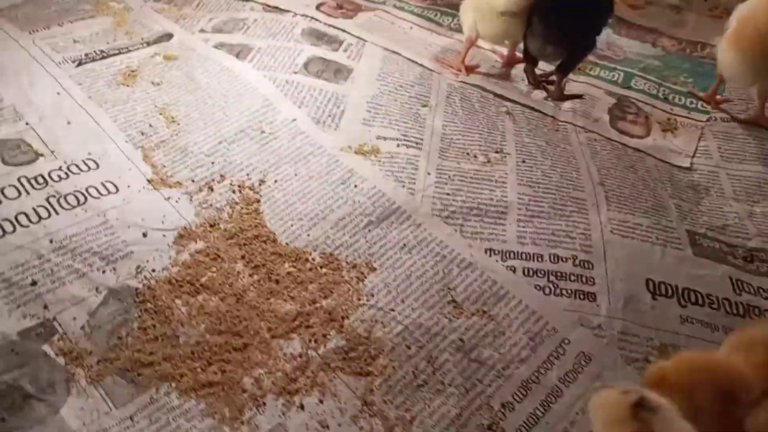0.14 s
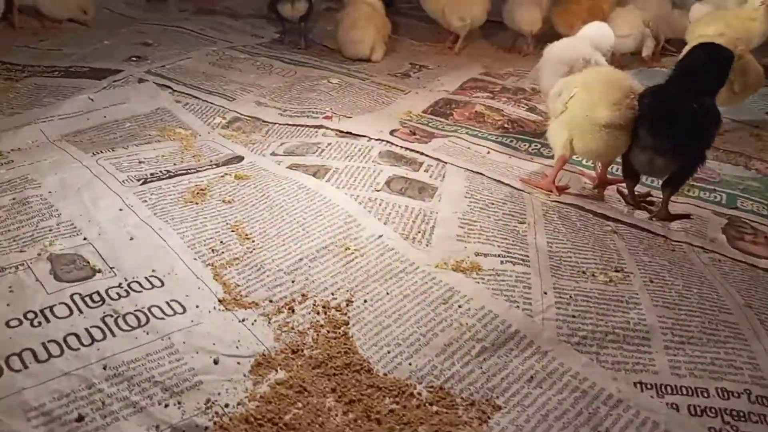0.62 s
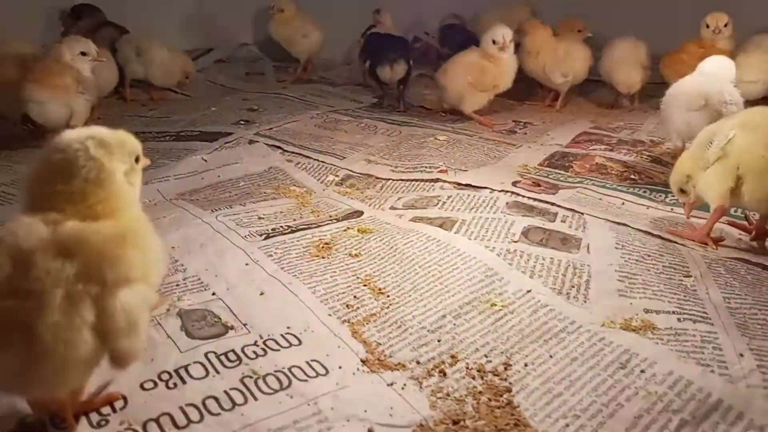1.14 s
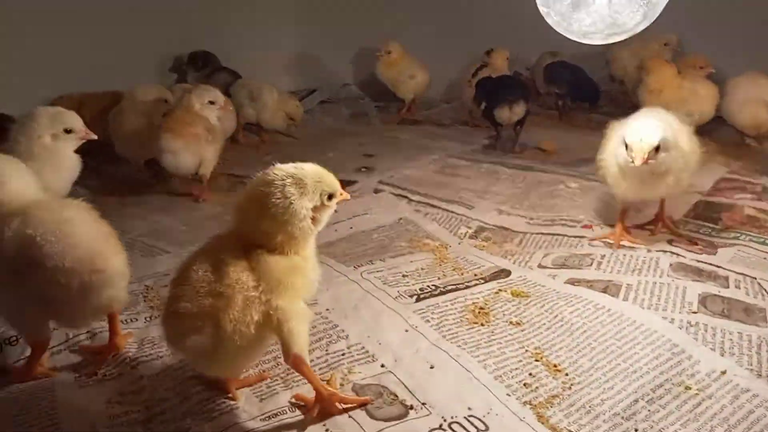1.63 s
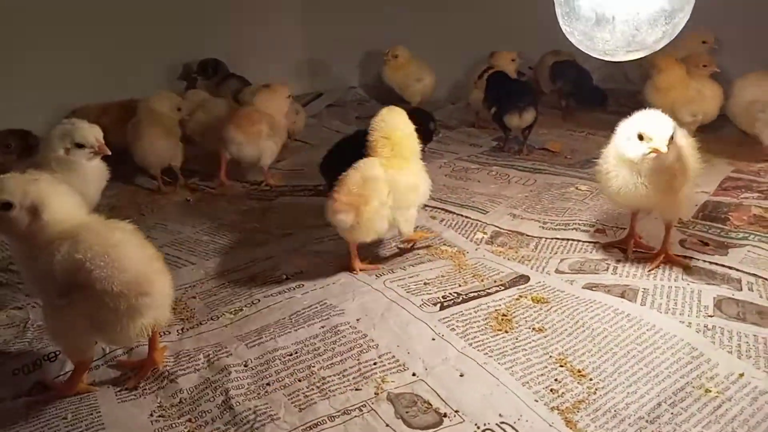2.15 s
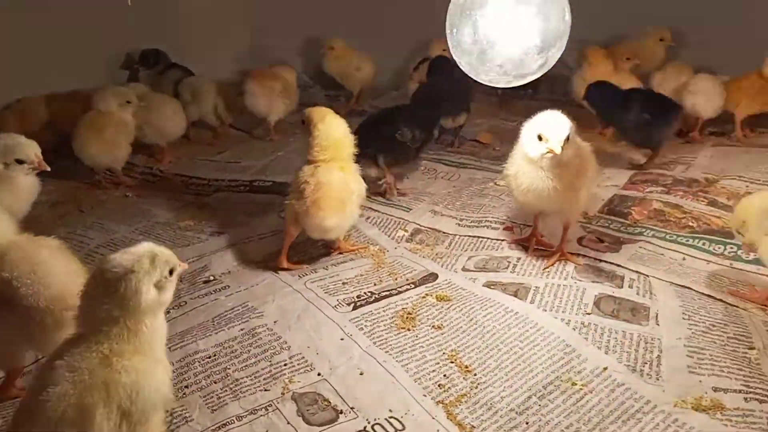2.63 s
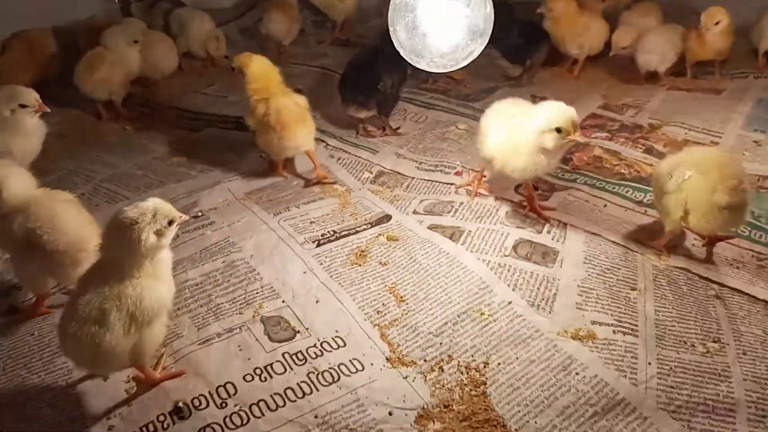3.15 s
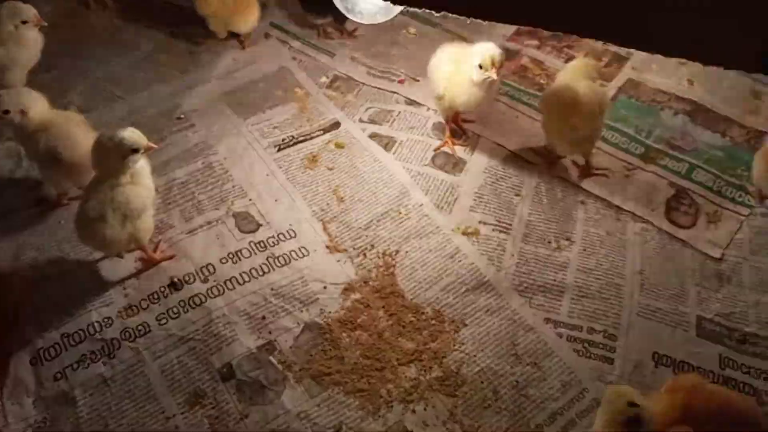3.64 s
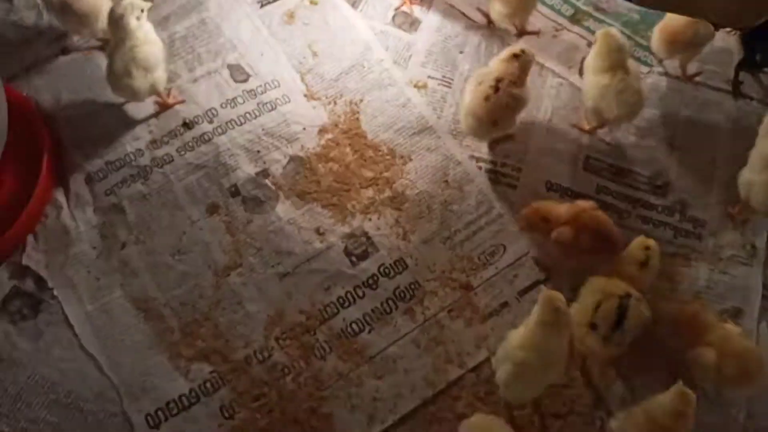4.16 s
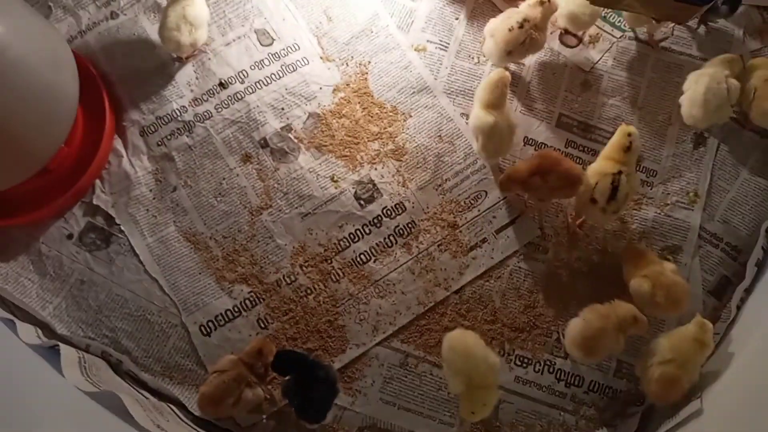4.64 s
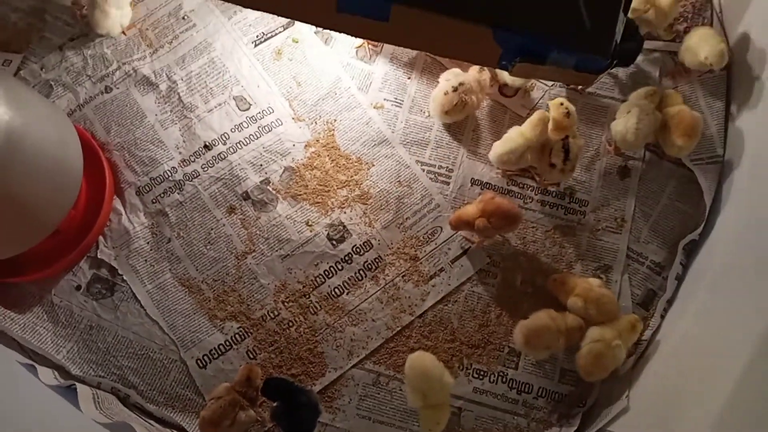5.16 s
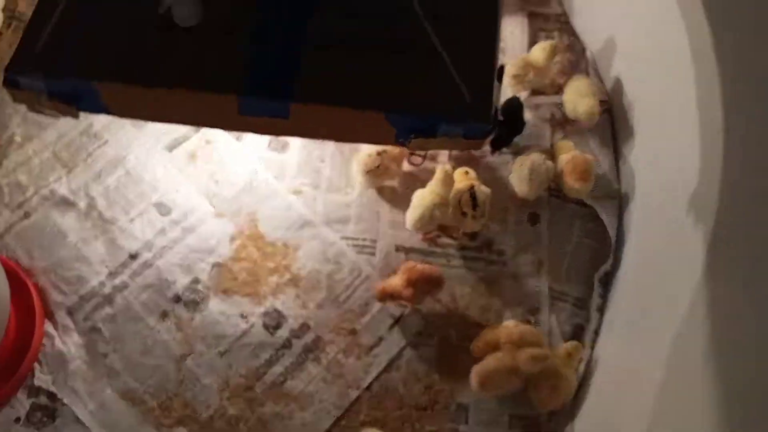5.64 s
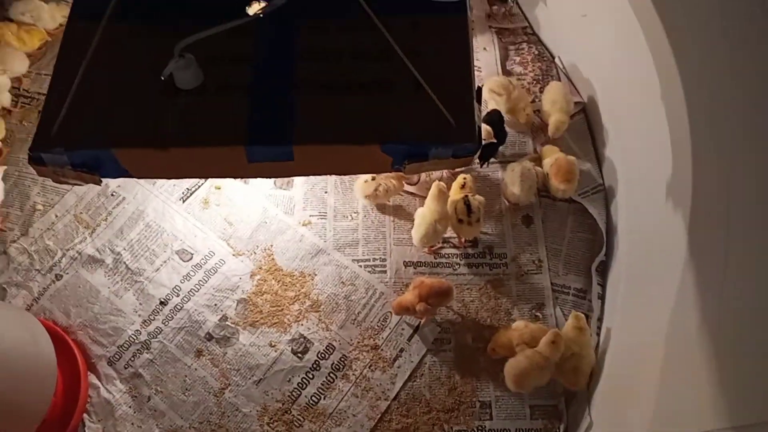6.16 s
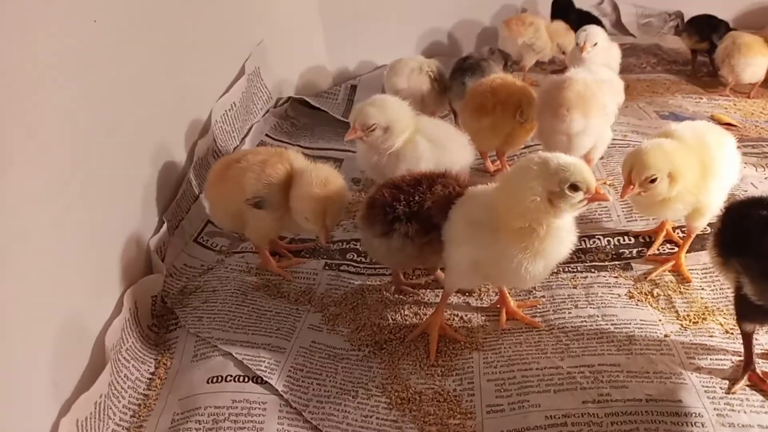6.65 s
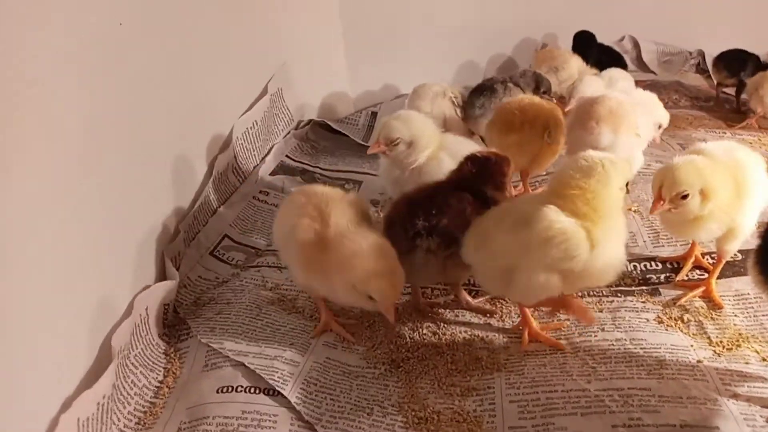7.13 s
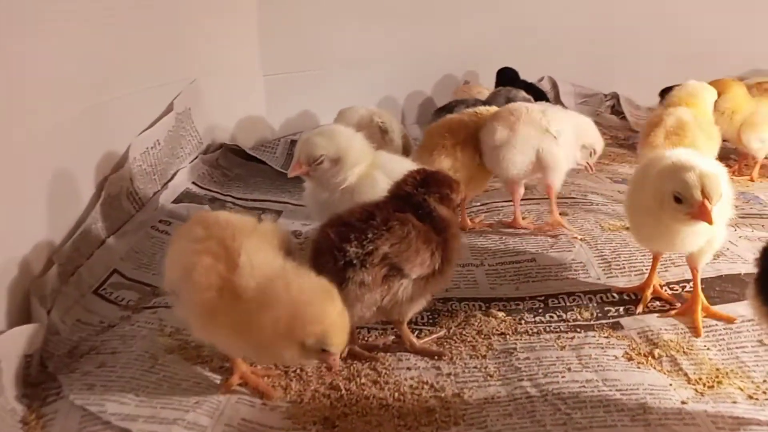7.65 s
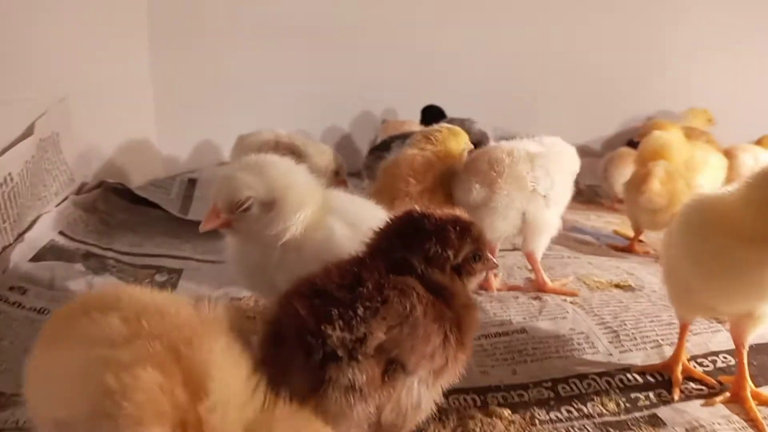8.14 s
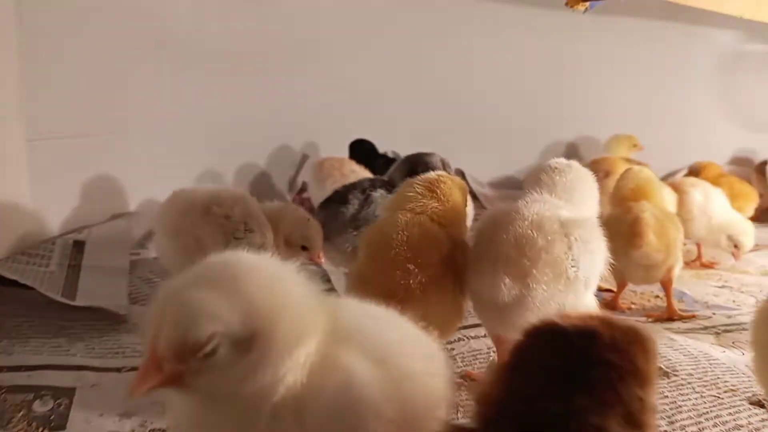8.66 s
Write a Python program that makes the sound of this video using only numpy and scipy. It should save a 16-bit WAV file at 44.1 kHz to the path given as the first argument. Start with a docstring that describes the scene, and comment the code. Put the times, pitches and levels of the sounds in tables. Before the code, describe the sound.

Many day-old chicks in a small, hard-walled pen lined with newspaper. Three near chicks repeat piercing falling cheeps over short peeps and a continuous reverberant crowd. Claws scratch paper in flurries. A handheld stereo microphone is rubbed and knocked mostly on the left until about five seconds; afterward the loud clear calls dominate, with a faint low hum swelling late.

```python
"""In a small pen lined with paper, under a lamp, day-old chicks peep: each call is a gliding sine with its octave.
Three near chicks repeat long falling calls over short near peeps and a random, reverberant crowd.
Feet scratch and tap as damped resonances; a hand rubs (band noise) and knocks (damped sines), mostly
on the left microphone. Noise bands flicker behind, a thin whistle steps and slides near 10 kHz,
and a low hum swells late."""
import sys
import numpy as np
from scipy import signal
from scipy.io import wavfile
from scipy.ndimage import uniform_filter1d

SR = 44100
rng = np.random.default_rng(int(sys.argv[2]) if len(sys.argv) > 2 else 0)


def file_out(sig):
    """Save sig as 16-bit WAV at sys.argv[1]."""
    # one column per channel
    cols = np.atleast_2d(sig).T
    # limit, then scale
    lim = np.clip(cols, -1, 1)
    pcm = np.round(lim * 32767).astype(np.int16)
    wavfile.write(sys.argv[1], SR, pcm)


def to_linear_factor(level_db):
    """Convert decibel levels (scalar or array-like) to linear amplitude factors."""
    exponent = np.asarray(level_db, float) / 20
    return 10 ** exponent


N = 387198  # samples
LEFT_LAG_S = 0.0010945  # the left channel lags the right


def in_time(rows):
    """Linear interpolation turns the columns after t/s into signals."""
    s, *columns = np.transpose(rows)
    return [np.interp(np.arange(N) / SR, s, c) for c in columns]


def band(x, low_hz, high_hz):
    """A Butterworth band-pass attenuates steeply outside its two corners."""
    return signal.sosfilt(signal.butter(4, [low_hz, high_hz], "band", fs=SR, output="sos"), x)


def rms_one(x):
    """Normalisation by the root mean square sets the effective value to 1."""
    return x / np.sqrt(np.mean(x ** 2))


def drift(rate_hz):
    """Interpolated Gaussian values form a slow random modulator."""
    steps = rng.standard_normal(int(N / SR * rate_hz) + 2)
    return np.interp(np.arange(N) / SR * rate_hz, np.arange(len(steps)), steps)


def pen(x, t60_s):
    """Reverberation between hard, close walls: convolution with decaying noise, independent for each ear."""
    t = np.arange(round(.4 * SR)) / SR
    tail = rng.standard_normal((2, len(t))) * to_linear_factor(-60 * t / t60_s) * (t > .002)
    early_echoes = (rng.random(tail.shape) < .01) * (t < .02)
    tail *= 1 + 4 * early_echoes
    unit_energy = tail / np.sqrt(np.sum(tail ** 2, 1, keepdims=True))
    return signal.fftconvolve(x, unit_energy, axes=1)[:, :N]


# Background spectrum: f/Hz of a band's upper edge, band level/dB in the left channel
AIR_SPECTRUM = [(30, -84.5), (600, -74.5), (1400, -71), (2200, -58), (4800, -43.5), (5600, -54.5),
                (7000, -41.5), (8600, -60.5), (12000, -61)]


def air():
    """Third-octave synthesis: noise bands fluctuate singly and together, weaker in the right channel."""
    edges = 30 * 2 ** np.arange(0, 8.7, 1 / 3)
    hz, db = np.transpose(AIR_SPECTRUM)
    white = rng.standard_normal((2, 2, N))  # neighbouring bands use different noises
    together = drift(9)
    out = 0
    for k, (low, high) in enumerate(zip(edges, edges[1:])):
        level_db = np.interp(np.log(high), np.log(hz), db) + 4 * drift(15) + 4 * together
        right_db = -20 if 5000 < low < 9000 else -7  # the right is shaded from the low treble
        noise = rms_one(band(white[k % 2], low, high))
        out = out + to_linear_factor(level_db) * noise * to_linear_factor([[0], [right_db]])
    flicker = to_linear_factor(-68.5 + 4.5 * together + 4.5 * drift(30))  # the highest treble flickers
    return out + flicker * rms_one(band(white[0], 14300, 15900))


# Late whistle glides: t/s, f/Hz
WHISTLE_GLIDES = [(6.9, 9880), (7.6, 9520), (7.63, 9820), (8.05, 9580), (8.08, 9830), (8.5, 9570)]


def whistle():
    """Frequency modulation: a tone steps through three pitches, later glides, and sits in narrow-band hiss."""
    steps_hz, round_s = np.array((9925, 9825, 9685)), .463  # one round holds three equal steps
    t = np.arange(N) / SR
    turn = (t / round_s + .1) % 1
    stepped_hz = steps_hz[(3 * turn).astype(int)]
    hz = np.where(t < WHISTLE_GLIDES[0][0], stepped_hz, in_time(WHISTLE_GLIDES)[0])
    waver = to_linear_factor(3 * drift(25))
    phase = 2 * np.pi * np.cumsum(hz + 15 * drift(40)) / SR
    tone = np.sin(phase) * to_linear_factor(-54) * waver
    hiss = rms_one(band(rng.standard_normal((2, N)), 9500, 10050))
    return tone + to_linear_factor(-56) * hiss


# How busy the feet are on the paper: t/s, level/dB before reverberation is added
FOOT_ACTIVITY = [(0, -49.5), (3.2, -43.5), (4.7, -51), (5.85, -58.5), (5.89, -50), (7.2, -48.5), (7.5, -64),
                 (8.78, -78)]


def scuffle():
    """Impulsive excitation of resonators: claws scratch paper in flurries, each scratch ringing a few cycles."""
    base_rate_hz, pitches = 700, 12
    born = rng.random(N) < base_rate_hz * to_linear_factor(8 * drift(10.5)) / SR
    sizes = born * to_linear_factor(5 * np.minimum(rng.exponential(1, N), 4)) * rng.choice([-1, 1], N)
    dealt = rng.integers(0, pitches, N)
    out = np.zeros((2, N))
    for k, hz in enumerate(np.geomspace(1150, 2600, pitches)):
        r = to_linear_factor(-60 * hz / (12 * SR))  # 60 dB of decay in 12 cycles
        w = 2 * np.pi * hz / SR
        hits = sizes * (dealt == k) + 1e-18
        out[k % 2] += signal.lfilter([0, np.sin(w)], [1, -2 * r * np.cos(w), r * r], hits)
    left, right = out[0] + out[1], out[0] - 0.22 * out[1]
    direct = rms_one(np.array([left, to_linear_factor(-10) * right]))
    return to_linear_factor(in_time(FOOT_ACTIVITY)[0]) * (direct + 0.98 * pen(direct, t60_s=0.25))


# Octave against the note: f/Hz of the octave, relative level/dB before each voice's own offset
OCTAVE_BALANCE = [(5000, -28), (7000, -16.5), (9000, -40), (12000, -23.5)]


def syrinx(out, s, hz, level, pan_db, octave_db=0, rasp_rad=0):
    """Phase modulation: a slower second vibration splits a raspy sine into sidebands; an octave is added."""
    rasp_hz, edge_s = 540, 0.015
    t = np.arange(len(hz)) / SR
    phase = 2 * np.pi * np.cumsum(hz) / SR + rasp_rad * np.sin(2 * np.pi * rasp_hz * t)
    edge = np.clip(np.minimum(t, t[-1] - t) / edge_s, 0, 1)
    octave = to_linear_factor(octave_db + np.interp(2 * hz, *np.transpose(OCTAVE_BALANCE)))
    breath = to_linear_factor(2.77 * np.interp(t * 150, np.arange(40), rng.standard_normal(40)))  # uneven
    voice = edge * level * breath * (np.sin(phase) + octave * np.sin(2 * phase))
    left_s = s + LEFT_LAG_S * (1 + .12 * rng.standard_normal())
    for channel, at, gain in ((0, left_s, 1), (1, s, to_linear_factor(-pan_db))):
        i = round(at * SR)
        piece = voice[max(-i, 0):max(N - i, 0)]
        out[channel, max(i, 0):max(i, 0) + len(piece)] += gain * piece


def peeps(rows, places):
    """Frequency glide: each short peep falls along a power curve; place sets the left-right level difference."""
    out = np.zeros((2, N))
    for (s, length, first_hz, target_hz, db), place in zip(rows, places):
        u = np.linspace(0, 1, round(1.15 * length * SR))  # runs on past the target
        bend = np.interp(first_hz, [4100, 4900], [2.0, 1.1])  # low peeps hold, high ones fall at once
        fall = (1.15 * u) ** bend - 0.197 * (bend - 1) * u * (1 - u)
        hz = first_hz + (target_hz - first_hz) * fall
        syrinx(out, s, hz, to_linear_factor(db) * np.sin(np.pi * u) ** 0.06, 8 + 12 * place, octave_db=4.5)
    return out


# Far chicks: t/s, relative level/dB
CROWD_LEVEL = [(0, -29.5), (1.1, -24), (5.1, -27.5), (6.5, -25.5), (8.78, -22.5)]


def crowd(count):
    """Superposition of random sources: far chicks peep at scattered times, each peep in its own place."""
    draw = rng.random((count, 6))
    s = (np.arange(count) + 3 * draw[:, 0]) / count * N / SR
    length = .03 + .045 * draw[:, 1]
    first_hz = 3300 + 1400 * draw[:, 2] ** 2
    target_hz = first_hz * (.66 + .17 * draw[:, 3])
    rows = np.c_[s, length, first_hz, target_hz, -18 * draw[:, 4]]
    return peeps(rows, draw[:, 5] - .3) * to_linear_factor(in_time(CROWD_LEVEL)[0] + 5.5)


# The microphones turn in the hand: t/s, left-right level/dB
MICROPHONE_FACING = [(0, 7.5), (2.5, 6.5), (5.2, 4), (6.8, 15), (7.6, 4.5), (8.78, 2)]


def long_calls(shape, calls, high_part_db, aside_db=0, rasp_rad=0):
    """Time and frequency scaling of one contour: the voice weakens in the drop, then falls louder."""
    out = np.zeros((2, N))
    when, pitch = np.transpose(shape)
    for s, stretch, scale, fall_db in calls:
        high_db = fall_db + high_part_db
        pan_db = np.interp(s, *np.transpose(MICROPHONE_FACING)) + aside_db
        t = np.arange(when[0], when[-1], 1 / SR / stretch)
        levels_db = [high_db, high_db - 4, fall_db, fall_db - 3, fall_db - 5]
        db = np.interp(t, [-.01, 0, .008, .04, when[-1]], levels_db)
        hz = uniform_filter1d(scale * np.interp(t, when, pitch), size=60)
        rasp = rasp_rad * np.clip(.5 - t / 0.06, 0, 1)  # fades out around the drop
        syrinx(out, s + when[0] * stretch, hz, to_linear_factor(db), pan_db, rasp_rad=rasp)
    return out


# Raspy contour: t/s from the steep drop, f/Hz; both before scaling
RASP_CONTOUR = [(-.075, 6250), (-.045, 6050), (-.02, 5580), (0, 5090), (.02, 4170), (.04, 3740),
                (.055, 2840)]
# Raspy calls: t/s of the drop, length factor/1, pitch factor/1, level/dB of the falling part
RASP_TIMES = [(.074, 0.9, 1.03, -17), (0.378, 0.85, 1.0, -13), (0.805, 0.95, 0.99, -16),
              (1.138, 1.0, 1.0, -15.5), (2.26, 0.9, 0.96, -18), (2.751, 1.12, 0.96, -25),
              (3.402, 1.17, 0.94, -19.5), (3.655, 0.79, 1, -15.5)]


def raspy_calls():
    """Sideband generation: phase modulation roughens the high part of one chick's falling call."""
    return long_calls(RASP_CONTOUR, RASP_TIMES, high_part_db=-8, aside_db=-4, rasp_rad=.75)


# Hand on the housing: t/s, length/s, low level/dB from pressure, crisp level/dB from speed; levels relative
RUB_STROKES = [(0.054, .12, -31, -53), (0.386, 0.17, -42.5, -57.5), (0.542, 0.13, -42.5, -55),
               (1.995, 0.061, -39.5, -56), (2.269, 0.13, -50.5, -52), (2.875, 0.14, -31, -48.5),
               (3.118, 0.35, -38.5, -52.5), (3.48, .24, -47, -54.5), (3.729, 0.17, -36, -44.5),
               (4.028, 0.24, -33, -61), (4.25, .15, -42, -52.5), (4.401, 0.2, -35.5, -55),
               (8.129, 0.29, -65.5, -59)]


def rub():
    """Friction noise: skin slips on the housing in patchy scuffs and sharp ticks, mostly on the left."""
    papery_db = 8.5  # papery middle, above the mean of low and crisp
    t, stroke = np.arange(N) / SR, np.zeros((3, N))
    for s, length, low_db, crisp_db in RUB_STROKES:
        db = [low_db, papery_db + (low_db + crisp_db) / 2, crisp_db]
        stroke += to_linear_factor(np.c_[db]) * np.sin(np.pi * np.clip((t - s) / length, 0, 1)) ** .8
    ticks = (rng.random(N) < 160 / SR) * to_linear_factor(6 * np.minimum(rng.exponential(1, N), 3))
    tick_swell = 1 + 1.1 * signal.lfilter([1], [1, -.95], ticks)
    grains = rng.standard_normal((2, N)) * to_linear_factor(4 * drift(30)) * tick_swell
    edges = [170, 700, 2600, 8200, 15800]  # Hz
    low, paper, crisp, top = [rms_one(band(grains, a, b)) for a, b in zip(edges, edges[1:])]
    # gains in dB, left then right
    soft = stroke[0] * to_linear_factor(4.8 * drift(28)) * low * to_linear_factor([[6], [-15]])
    papery = stroke[1] * to_linear_factor(6 * drift(19)) * paper * to_linear_factor([[7], [-9]])
    bright = stroke[2] * (crisp * to_linear_factor([[19], [4]]) + top)
    return soft + papery + bright


# Knocks: t/s, relative level/dB, thud f/Hz
KNOCK_HITS = [(0.075, -16.5, 250), (0.5064, -6, 1620), (0.126, -12, 586), (0.569, -15, 350),
              (.587, -10.5, 2090), (.5985, -11.5, 1500), (.95, -16.5, 1690), (2.691, -6.5, 198),
              (2.861, -20.5, 296), (2.9201, -8, 1230), (2.9322, -13, 1200), (2.997, -4, 870),
              (3.222, -14.5, 387), (3.742, -11, 306), (4.167, -8, 407), (4.336, -13, 484), (4.442, -7, 437),
              (4.454, -5.5, 475), (4.468, -9.5, 503), (4.4996, -18, 1490), (4.5172, -14, 905),
              (4.5796, -15, 1350), (4.5952, -14, 1140), (4.7572, -41, 1510), (5.033, -19.5, 447),
              (5.35, -17, 446)]


def knocks():
    """Damped oscillation: a knock is a thud of about one cycle with a short noise snap, mostly on the left."""
    thuds, snaps = np.zeros((2, N))
    t = np.arange(round(.04 * SR)) / SR
    for s, db, hz in KNOCK_HITS:
        thud = to_linear_factor(db + 4) * np.sin(2 * np.pi * hz * t) * np.exp(-t * hz * 1.37)
        snap = to_linear_factor(db) * rng.standard_normal(len(t)) * np.exp(-t / 0.0013)
        thuds[round(s * SR):][:len(t)] += thud
        snaps[round(s * SR):][:len(t)] += snap
    mono = band(thuds, 82, 6000) + band(snaps, 920, 3000) + to_linear_factor(-10) * band(snaps, 5000, 9000)
    return mono * to_linear_factor([[0], [-24]])


# Near short peeps: t/s, nominal length/s, first f/Hz, relative level/dB
NEAR_PEEPS = [(0.309, 0.058, 3690, -18), (0.553, 0.042, 4100, -21.5), (0.757, 0.047, 3945, -19.5),
              (0.989, 0.054, 3620, -18.5), (1.107, 0.037, 3140, -18), (1.215, 0.034, 3860, -14.5),
              (1.246, 0.06, 3300, -19), (1.393, 0.015, 4010, -8), (1.414, 0.025, 4130, -13.5),
              (1.515, 0.048, 3740, -16.5), (1.589, 0.083, 5320, -25), (1.673, 0.035, 4170, -18.5),
              (2.012, 0.068, 3975, -16), (2.134, 0.082, 3940, -24), (2.344, 0.069, 4290, -24),
              (2.4, 0.08, 5180, -25), (2.926, 0.069, 4270, -23), (3.166, 0.042, 3775, -19.5),
              (3.007, 0.066, 4400, -24.5), (3.207, 0.067, 5030, -26.5), (3.211, 0.047, 3030, -18),
              (3.273, 0.056, 3890, -21.5), (3.343, 0.071, 3206, -21), (3.365, 0.033, 3730, -21),
              (3.838, 0.067, 3890, -21), (4.086, 0.047, 4550, -20), (4.693, 0.1, 5440, -24.5),
              (5.504, .055, 4800, -38), (5.6, 0.044, 4120, -29), (6.172, 0.066, 3800, -24.5),
              (6.905, 0.057, 4630, -15.5), (6.973, 0.059, 4260, -20), (7.321, 0.07, 4173, -18),
              (7.397, 0.069, 3620, -22), (7.884, 0.028, 3040, -12.5), (7.969, 0.034, 3392, -15),
              (8.104, 0.021, 3380, -10), (8.11, 0.075, 3650, -18.5), (8.344, 0.066, 3820, -18.5),
              (8.626, 0.058, 3550, -16), (8.643, 0.058, 4000, -17), (8.716, 0.041, 3474, -13.5)]


def near_peeps():
    """Relaxation of a tense vibrator: every near peep sags toward the pitch of the slack syrinx."""
    slack_hz, fall_share = 2632, 0.64  # the target lies this share of the way to the slack pitch
    s, length, first_hz, db = np.transpose(NEAR_PEEPS)
    target_hz = first_hz - fall_share * (first_hz - slack_hz)
    return peeps(np.c_[s, length, first_hz, target_hz, db], rng.random(len(NEAR_PEEPS)))


# Feet and beaks on the floor: t/s, relative level/dB, f/Hz
FLOOR_TAPS = [(0.62, -39, 107), (0.707, -23.5, 990), (2.311, -22, 1627), (2.35, -24.5, 1010),
              (3.098, -26.5, 1840), (5.114, -33.5, 435), (6.806, -29.5, 1020), (6.994, -35, 450),
              (7.674, -34, 158), (8.339, -33, 234.7)]


def taps():
    """Impact resonance: a tap rings a few damped cycles and reaches the left microphone later but louder."""
    out = np.zeros(N)
    t = np.arange(round(.08 * SR)) / SR
    for s, db, hz in FLOOR_TAPS:
        envelope = np.exp(-t * hz * 0.44) * np.minimum(t * hz, 1)
        out[round(s * SR):][:len(t)] += to_linear_factor(db + 11) * np.sin(2 * np.pi * hz * t) * envelope
    return np.array([np.roll(out, round(LEFT_LAG_S * SR)), to_linear_factor(-11) * out])


# Arched contour: t/s from the steep drop, f/Hz; both before scaling
ARCH_CONTOUR = [(-.12, 4920), (-.09, 5300), (-.05, 5400), (-.01, 5230), (0, 4900), (.009, 4250),
                (.036, 3650), (.056, 2500)]
# Arched calls: t/s of the drop, length factor/1, pitch factor/1, level/dB of the falling part
ARCH_TIMES = [(.935, 0.75, 0.96, -26), (1.57, .92, .97, -23), (1.815, .7, .92, -21),
              (1.897, .8, .985, -16.5), (2.385, 1, 1.01, -24), (2.91, 0.9, 1.0, -24),
              (3.585, 0.89, .985, -24), (4.185, 1.05, .975, -21), (4.515, .75, 1.01, -24),
              (5.035, 0.8, 1.02, -25), (6.036, .8, 1.035, -14.5), (6.44, .75, 1.025, -13),
              (7.556, 0.97, 1, -16), (7.917, 0.78, 1.01, -13), (8.44, 1.05, 1.01, -17)]


def arched_calls():
    """Frequency glide: one chick's pitch rises in an arch before its steep drop."""
    return long_calls(ARCH_CONTOUR, ARCH_TIMES, high_part_db=-10.5, aside_db=-3)


# Stepped contour: t/s from the steep drop, f/Hz; both before scaling
STEP_CONTOUR = [(-.1, 5997), (-.05, 5787), (-.008, 5303), (0, 5123), (.008, 4350), (.047, 3590),
                (.066, 2370)]
# Stepped calls: t/s of the drop, length factor/1, pitch factor/1, level/dB of the falling part
STEP_TIMES = [(3.991, 0.99, 0.96, -17.5), (4.256, 0.72, 0.98, -12), (4.595, 0.84, 1.017, -11),
              (5.338, 0.78, 1.016, -12.5), (5.663, 0.77, 0.98, -10.5), (5.776, .6, 1.013, -15.5),
              (5.954, 0.68, .94, -11), (6.351, 0.83, 1.005, -9), (6.834, 0.84, 1.017, -8.5),
              (7.222, 1, 1.01, -9.5), (7.682, 0.95, 1.01, -7), (8.039, 0.82, 0.99, -10),
              (8.475, 1, 1.01, -10.5)]


def stepped_calls():
    """Frequency glide: one chick's pitch sinks, drops in a steep step, then sinks on."""
    return long_calls(STEP_CONTOUR, STEP_TIMES, high_part_db=-8.5)


# Hum swell: t/s, relative level/dB
HUM_LEVEL = [(5.86, -57.5), (6.45, -57), (6.6, -71), (6.9, -68), (7.0, -54), (7.5, -42.5), (7.9, -51),
             (8.78, -63)]


def hum():
    """Amplitude modulation: a wavering low tone and low-band noise, the same wave in both ears, softer right."""
    t = np.arange(N) / SR
    tone = np.sin(2 * np.pi * 69 * t) * to_linear_factor(2 * drift(22))
    rumble = 0.45 * rms_one(band(rng.standard_normal(N), 50, 114))
    swell = to_linear_factor(in_time(HUM_LEVEL)[0] + 4) * (t > HUM_LEVEL[0][0])
    return (tone + rumble) * swell * to_linear_factor([[0], [-7]])


def scene():
    """Linear superposition: direct and reverberant chicks, their feet, the hand and the background."""
    near = raspy_calls() + near_peeps() + arched_calls() + stepped_calls()
    far = crowd(count=420)
    reverberant = pen(to_linear_factor(-5) * near + to_linear_factor(-6) * far, t60_s=0.17)
    chicks = near + to_linear_factor(-4.5) * far + reverberant
    return air() + whistle() + scuffle() + chicks + rub() + knocks() + taps() + hum()


def low_pass(x):
    """Removes everything above the highest recorded frequency."""
    return signal.sosfilt(signal.butter(12, 17010, fs=SR, output="sos"), x)


def record(dry):
    """Unity gain: the finished mix is passed on without equalisation or added noise."""
    return low_pass(dry)


dry = scene()
out = record(dry)
file_out(out)
```